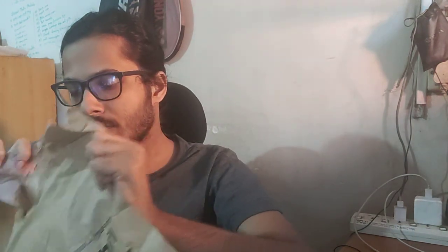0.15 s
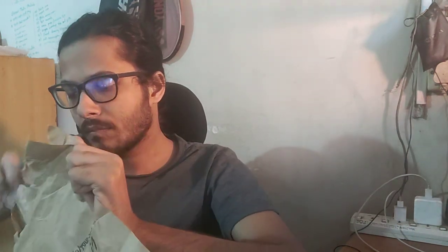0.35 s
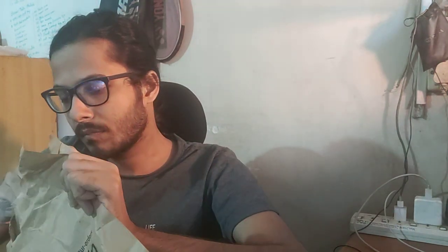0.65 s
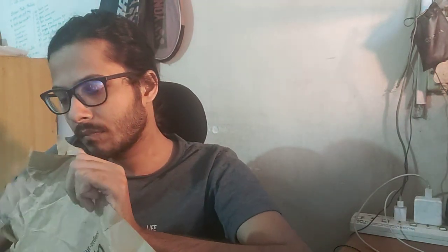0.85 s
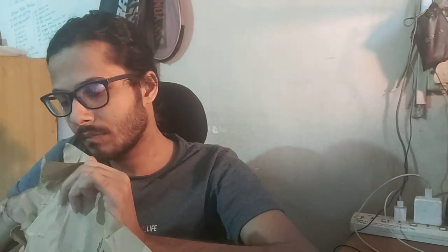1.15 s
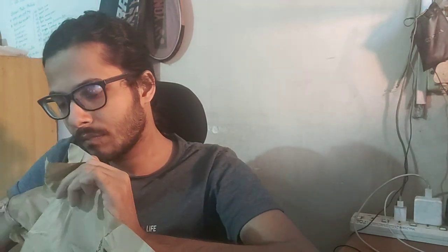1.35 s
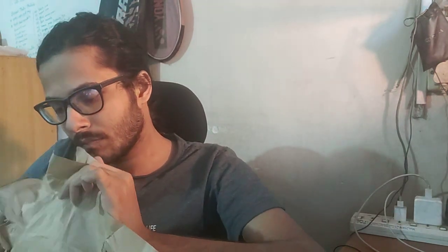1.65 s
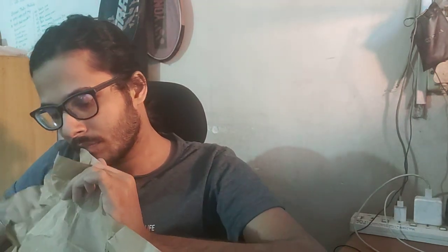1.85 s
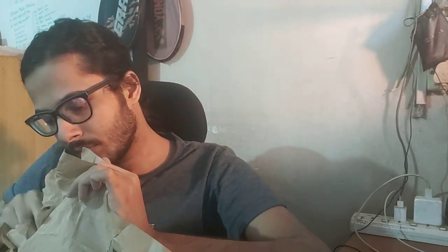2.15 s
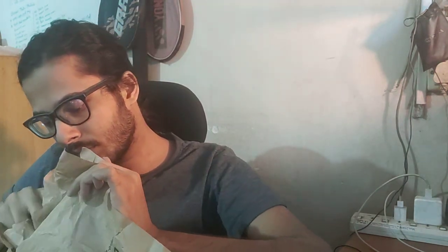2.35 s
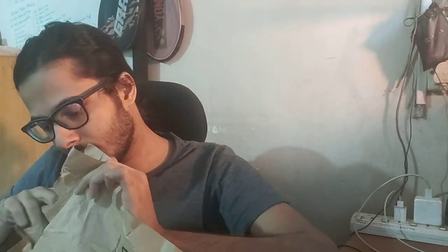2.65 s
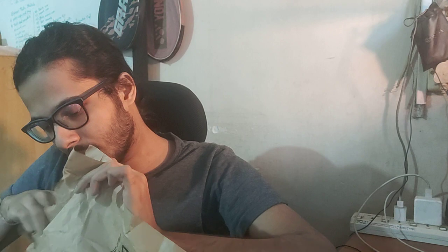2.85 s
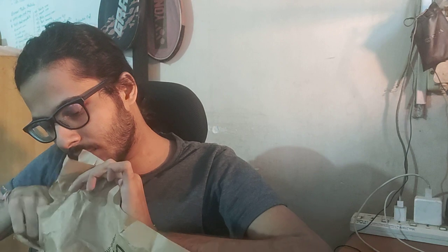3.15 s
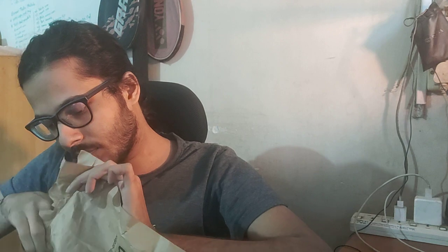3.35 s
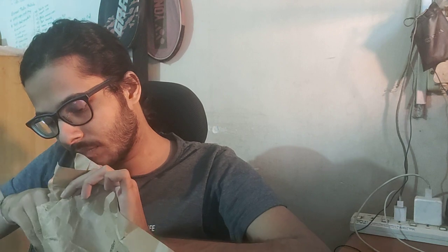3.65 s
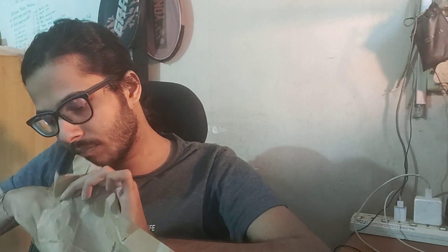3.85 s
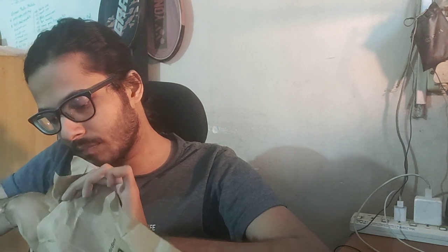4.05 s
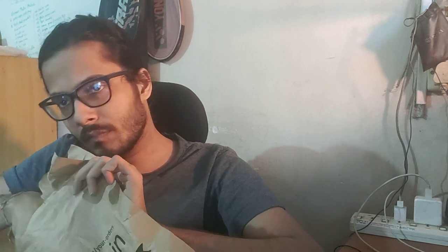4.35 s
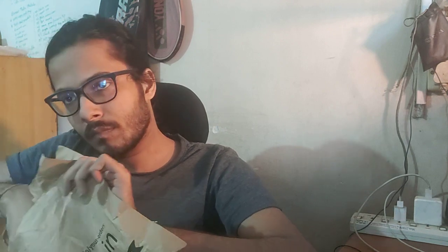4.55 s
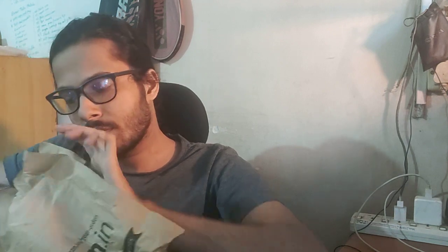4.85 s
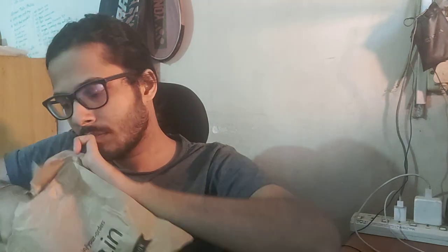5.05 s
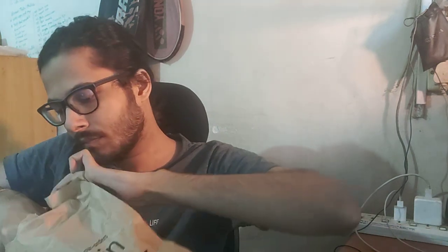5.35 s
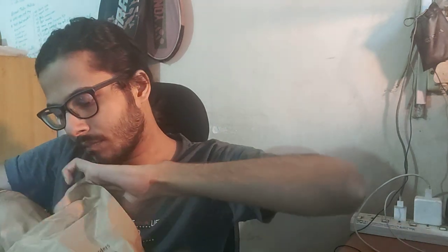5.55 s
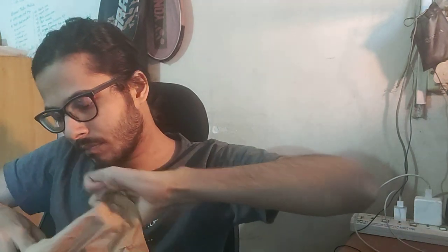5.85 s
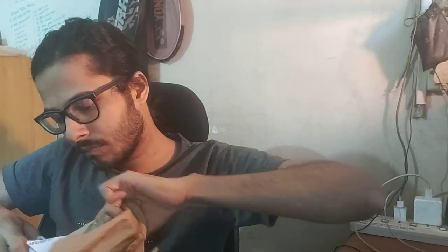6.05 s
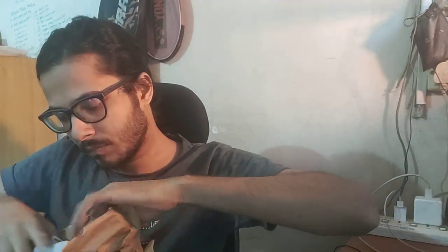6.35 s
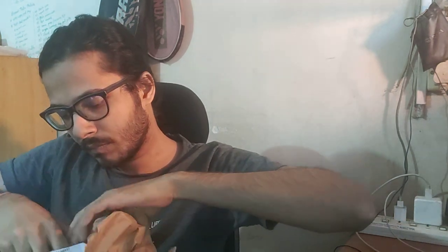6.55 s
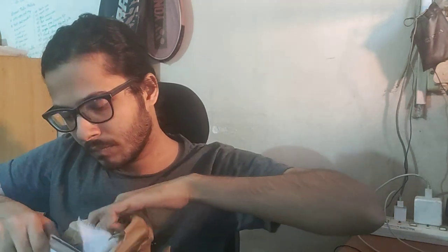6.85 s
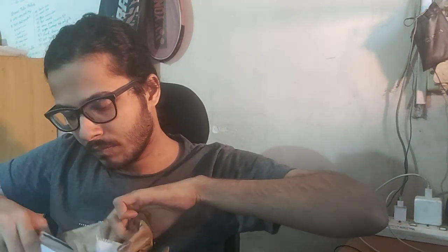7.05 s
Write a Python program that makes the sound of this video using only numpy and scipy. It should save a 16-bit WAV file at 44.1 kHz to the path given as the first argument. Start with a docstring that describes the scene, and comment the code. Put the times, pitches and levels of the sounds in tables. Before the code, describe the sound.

Brown paper bag crinkles and snaps in restless hands close to a microphone, builds to one hard ripping pull, then settles into small rustles.

```python
"""A desk in a small room: a brown paper bag is worked open by hand close to a bright little microphone.
Each flex of the fingers triggers a swarm of tiny crackle bursts over noise of sliding paper.
Big creases snap as a bright crack plus a duller knock of the sheet; one hard pull rips the bag.
Moving bag and arms add low noise rumble and one-cycle bumps; two dull taps ring damped modes.
The room answers the paper with a short tail; a steady hiss and two faint thin tones lie behind."""
import sys
import numpy as np
from scipy import signal
from scipy.fft import rfft, irfft
from scipy.io import wavfile
from scipy.ndimage import uniform_filter1d

SR = 44100
rng = np.random.default_rng(int(sys.argv[2]) if len(sys.argv) > 2 else 0)


def dump_mix(stems):
    """Bounce the given channels to the path in sys.argv[1] as a 16-bit WAV at rate SR."""
    frames = np.atleast_2d(stems).T  # one column per channel
    limited = np.clip(frames, -1, 1)  # hard clip at full scale
    pcm = np.round(limited * 32767).astype(np.int16)
    wavfile.write(sys.argv[1], SR, pcm)


N = 317961  # length in samples


def from_db(db):
    """Decibels to amplitude gain."""
    return 10 ** (np.asarray(db) / 20)


def rms_one(x):
    """Scale each row to rms 1."""
    return x / np.sqrt(np.mean(x ** 2, axis=-1, keepdims=True) + 1e-20)


def add(out, start_s, sound):
    """Mix a sound in at a time."""
    at = max(int(start_s * SR), 0)
    out[at:at + len(sound)] += sound[:max(N - at, 0)]


def drift(knots_per_s):
    """Slow random wander: straight lines between normal random knots of spread 1."""
    knots = rng.standard_normal(4000)
    return np.interp(np.arange(N) / SR * knots_per_s, np.arange(len(knots)), knots)


def colour(x, spectrum, size=512):
    """Filter each row to a spectrum with minimum phase, so nothing sounds ahead of its cause."""
    hz, db = np.transpose(spectrum)
    bin_hz = np.arange(size // 2 + 1) * SR / size
    log_gain = np.log(from_db(np.interp(np.log(bin_hz + 1), np.log(hz), db)))
    # doubling the later half-cepstrum folds it into a causal response
    cepstrum = irfft(log_gain)[:size // 2] * np.r_[1, np.full(size // 2 - 1, 2)]
    response = irfft(np.exp(rfft(cepstrum, size)))
    wet = signal.fftconvolve(np.atleast_2d(x), response[None], axes=1)
    return wet[:, :x.shape[-1]].reshape(x.shape)


def evened(x, span_s):
    """Hold the slow level near rms 1 and leave single clicks standing."""
    slow_power = np.maximum(uniform_filter1d(x ** 2, max(int(span_s * SR), 2)), 0)
    return x / np.sqrt(slow_power + 1e-3 * np.mean(x ** 2))


def gestures(rows, attack_s, release_s, held_db):
    """Level in dB of hand movements: each swells, holds and dies away over a resting level."""
    t, power = np.arange(N) / SR, np.full(N, from_db(held_db) ** 2)
    for start_s, length_s, db in rows:
        near = slice(max(int(start_s * SR), 0), int((start_s + length_s + 1) * SR))
        age = t[near] - start_s
        swell = np.clip(age / attack_s, 0, 1)
        decay = np.exp(-np.maximum(age - length_s, 0) / release_s)
        power[near] += (from_db(db) * swell * decay) ** 2
    return 10 * np.log10(power)


# Colour of the background hiss, relative: (f/Hz, level/dB per Hz)
HISS_SPECTRUM = [(30, 2.5), (90, -6.5), (220, -13.5), (390, -9.5), (520, -15), (780, -13), (2100, -22),
                 (4800, -21.5), (6500, -9.5), (7500, -19.5), (8500, -44.5)]
HISS_DB = -50.5  # rms


def steady_hiss():
    """Random noise of constant level and fixed colour."""
    return from_db(HISS_DB) * rms_one(colour(rng.standard_normal(N), HISS_SPECTRUM, size=4096))


# Fingers flexing the paper, before layer gains:
# (start t/s, length t/s, crackle level/dB, sheet level/dB)
FLEXES = [(0, 0.015, -35, -45), (0.186, .225, -44, -50.5), (0.233, 0.052, -34, -45),
          (0.544, 0.1, -48.5, -65), (0.674, .14, -41, -56.5), (0.928, .09, -42.5, -58),
          (1.081, .065, -39, -44.5), (1.161, 0.19, -50, -52.5), (1.417, .08, -38.5, -46),
          (1.531, .035, -41, -45.5), (1.597, 0.08, -45, -48), (1.687, .09, -40, -47.5),
          (1.838, 0.021, -41.5, -52), (1.915, 0.081, -39.5, -46.5), (2.034, 0.025, -45.5, -50.5),
          (2.144, 0.04, -46, -72), (2.328, 0.044, -47.5, -63), (2.469, 0.022, -49, -54),
          (2.576, 0.084, -44, -49.5), (2.665, .11, -44, -57), (2.813, 0.027, -49, -56),
          (3.001, 0.11, -41, -50), (3.093, 0.16, -38, -46), (3.28, .14, -47, -57), (3.49, 0.083, -43, -57),
          (3.597, 0.13, -43, -47.5), (3.701, .04, -37.5, -47.5), (3.799, .085, -46, -49),
          (3.946, 0.068, -39.5, -45), (4.042, .15, -35.5, -48.5), (4.204, .14, -42, -43),
          (4.348, 0.017, -44.5, -42), (4.719, 0.026, -54.5, -51), (4.784, 0.031, -43.5, -47.5),
          (4.882, 0.035, -44.5, -65), (5.055, .19, -39.5, -48.5), (5.249, .18, -39.5, -43.5),
          (6.305, 0.03, -34.5, -51), (6.368, .21, -41, -48), (6.681, 0.036, -48, -48.5),
          (6.751, .08, -42, -53.5), (6.906, .07, -44.5, -57), (6.969, .24, -38.5, -48.5)]
FLEX_ATTACK_S, FLEX_RELEASE_S = 0.022, 0.031  # the grip tightens, then the paper settles
HELD_CRACK_DB, HELD_SHEET_DB = -57.5, -59.5  # the bag creaks faintly even when just held
# Effort of the hard pull that rips the bag: (t/s, crackle level/dB before layer gains)
PULL = [(5.575, -63), (5.597, -36), (5.811, -33), (5.835, -22.5), (5.955, -28.5), (6.035, -39),
        (6.123, -31), (6.19, -43), (6.225, -65)]
PULL_SHEET_DB = -8.5  # sheet relative to crackle


def paper_effort():
    """Hand force as crackle and sheet levels in dB: the louder of small flexes and the hard pull."""
    starts, lengths, cracks_db, sheets_db = np.transpose(FLEXES)
    pull_s, pull_levels = np.transpose(PULL)
    pull_db = np.interp(np.arange(N) / SR, pull_s, pull_levels)
    crack_db = gestures(zip(starts, lengths, cracks_db), FLEX_ATTACK_S, FLEX_RELEASE_S, HELD_CRACK_DB)
    sheet_db = gestures(zip(starts, lengths, sheets_db), FLEX_ATTACK_S, FLEX_RELEASE_S, HELD_SHEET_DB)
    return np.maximum(crack_db, pull_db), np.maximum(sheet_db, pull_db + PULL_SHEET_DB)


def small_folds(effort_db, per_s, growth, spread_db, clump_db):
    """Little creases give way in clumps, faster under more effort; most are tiny, a few are large."""
    effort_above = effort_db - np.median(effort_db)
    rate = per_s * from_db(growth * effort_above + clump_db * drift(45))
    sizes = from_db(spread_db * np.minimum(rng.exponential(1, N), 3.6)) * rng.choice([-1, 1], N)
    return sizes * (rng.random(N) < rate / SR)


def buckles(spectrum, rises, vary_db, facet_hz, octaves, ring_db, ring_cycles, size=1100):
    """One unit-energy burst per rise time: a fold's noise flurry sets a facet of paper ringing."""
    t, bursts = np.arange(size) / SR, []
    for rise_s in rises:
        age = t / rise_s
        own_spectrum = [(hz, db + rng.normal(0, vary_db)) for hz, db in spectrum]
        noise = rng.standard_normal(size) * age * np.exp(-age)
        flurry = rms_one(colour(noise, own_spectrum))
        pitch = facet_hz * 2 ** (octaves * rng.uniform(-0.498, 0.486))
        decay = from_db(-60 * pitch * t / ring_cycles)  # 60 dB down after ring_cycles
        ring = rms_one(np.sin(2 * np.pi * pitch * t) * (1 - np.exp(-age)) * decay)
        bursts.append(flurry + from_db(ring_db + rng.normal(0, 3.3)) * ring)
    return rms_one(np.array(bursts)) / np.sqrt(size)


# Colour of a fold cracking, relative: (f/Hz, level/dB per Hz)
CRACK_SPECTRUM = [(400, -47.5), (1500, -25.5), (3000, -18.5), (4200, -13.5), (5200, -9.5), (6000, -1),
                  (6600, 1.5), (7300, -4.5), (7900, -18.5), (8600, -22.5)]
# Colour of the paper sheet around it, relative: (f/Hz, level/dB per Hz)
SHEET_SPECTRUM = [(120, -14.5), (250, -8.5), (390, -2), (540, -6), (780, -5.5), (1100, -1.5), (1350, -1.5),
                  (1600, 1), (2200, -2), (3200, -1), (4500, -1), (7000, -16)]


def small_creases():
    """A stock of 200 small creases: the bright crack of each and the slower, duller sheet."""
    rises = 0.00035 * from_db(rng.normal(0, 5.4, size=200))  # s
    bright = buckles(CRACK_SPECTRUM, rises, vary_db=3.5, facet_hz=5900, octaves=0.6,
                     ring_db=-11, ring_cycles=95)
    dull = buckles(SHEET_SPECTRUM, 1.74 * rises, vary_db=4.5, facet_hz=2088, octaves=1.8,
                   ring_db=-11, ring_cycles=55)
    return bright, dull


def crinkle(folds, creases, spectrum, grain_db, slide_db, slide_rough_db):
    """Little folds dealt to many creases, over the uneven hiss of paper sliding on paper."""
    dealt = rng.integers(0, len(creases), N)
    sizes = folds * from_db(rng.normal(0, 2.35, N))
    grains = np.zeros(N)
    for at in np.flatnonzero(folds):
        add(grains, at / SR, sizes[at] * creases[dealt[at]])
    rough_noise = rng.standard_normal(N) * from_db(slide_rough_db * drift(220))
    slide = rms_one(colour(rough_noise, spectrum))
    return from_db(grain_db) * evened(grains, 0.054) + from_db(slide_db) * slide


def stray_ticks(effort_db, bright, dull, per_s, crack_db, sheet_db, follows, spread_db):
    """Now and then a lone crease ticks, even in the lulls; it is louder under more effort."""
    out, draws = np.zeros(N), rng.random((len(bright), 3))
    middle_db = np.median(effort_db)
    for k, (when, crack_size, sheet_size) in enumerate(draws):
        start_s = (k + when) / per_s  # one at random in each equal slot
        if start_s < N / SR:
            crack = from_db(crack_db + spread_db * crack_size) * bright[k]
            sheet = from_db(sheet_db + spread_db * (sheet_size - 1)) * dull[k]
            effort_gain = from_db(follows * (effort_db[int(start_s * SR)] - middle_db))
            add(out, start_s, effort_gain * (crack + sheet))
    return out


def room(x, t60, tail_db, near_db, near_s, near_t60):
    """Desk and near wall scatter the sound back within milliseconds; a short tail follows."""
    t = np.arange(SR // 2) / SR
    tail = rng.standard_normal(len(t)) * from_db(-60 * t / t60) * (t > 0.003)
    near = rng.standard_normal(len(t)) * from_db(-60 * t / near_t60) * (t > near_s)
    response = from_db(tail_db) * rms_one(tail) + from_db(near_db) * rms_one(near)
    return x + signal.fftconvolve(x, response / np.sqrt(len(t)))[:N]


# Arms shifting the bag: (start t/s, length t/s, level/dB before the rumble gain)
SHIFTS = [(.04, 0.065, -38), (.2, 0.15, -38.5), (.47, 0.42, -39), (.92, 0.51, -47.5), (1.54, 0.31, -49),
          (2.04, .15, -44.5), (2.36, 0.18, -47), (2.73, 0.13, -40), (2.95, 0.16, -39), (3.1, 0.12, -45),
          (3.3, .5, -45.5), (3.88, 0.27, -47), (4.53, 0.21, -42), (4.92, 0.66, -44), (5.59, 0.35, -42),
          (6.05, 0.047, -38), (6.22, 0.051, -39), (6.4, 0.32, -40.5), (6.79, 0.36, -43),
          (7.02, 0.18, -42.5)]
SHIFT_ATTACK_S, SHIFT_RELEASE_S, HELD_RUMBLE_DB = 0.012, 0.03, -54
# Colour of the low rumble, relative: (f/Hz, level/dB per Hz)
RUMBLE_SPECTRUM = [(12, -7.5), (26, 4), (90, 0), (170, -8.5), (260, -18.5), (400, -29.5), (900, -62.5)]


def handling_rumble(rumble_db, lumpy_db):
    """The arms shift the bag: lumpy low noise swells with each movement."""
    lumps = rng.standard_normal(N) * from_db(lumpy_db * drift(50))
    moving_db = gestures(SHIFTS, SHIFT_ATTACK_S, SHIFT_RELEASE_S, HELD_RUMBLE_DB)
    return from_db(moving_db + rumble_db) * evened(colour(lumps, RUMBLE_SPECTRUM, size=8192), 0.12)


# Creases that buckle loudly, before layer gains:
# (t/s, level/dB of the fold's crack, level/dB of the sheet round it)
SNAPS = [(0.0606, -34, -40), (0.139, -40, -45), (0.2087, -33.5, -35), (0.2444, -35, -43), (0.269, -40, -42),
         (0.2828, -28, -33.5), (0.359, -35, -42), (0.411, -34.5, -39), (0.7118, -35, -52),
         (0.811, -32.5, -47), (1.0134, -39, -39), (1.0926, -34.5, -40), (1.294, -39, -36),
         (1.3621, -33.5, -49), (1.453, -19.5, -28.5), (1.65, -45, -50), (1.7655, -40, -40.5),
         (1.9233, -41, -45), (1.9442, -39, -37), (1.9681, -31, -36), (2.0534, -33.5, -39),
         (2.4178, -38, -57), (2.6037, -31.5, -46), (2.7096, -38, -37), (2.7515, -29.5, -47),
         (3.1467, -36, -53), (3.2561, -28.5, -32), (3.4537, -25.5, -38.5), (3.5604, -34, -43),
         (3.598, -26.5, -57), (3.707, -21, -33), (3.7284, -25, -47.5), (3.7919, -19.5, -38.5),
         (3.877, -40, -45), (3.9671, -34.5, -47), (3.9846, -36, -51), (4.0773, -31, -38),
         (4.0955, -29.5, -38.5), (4.1683, -40.5, -55), (4.1963, -29, -50), (4.262, -33.5, -36),
         (4.2905, -21.5, -35.5), (4.3316, -25.5, -53), (4.5039, -28, -37.5), (4.582, -41, -41.5),
         (4.647, -39, -41), (4.8085, -30, -54), (4.8956, -36, -40.5), (5.0146, -39, -53), (5.06, -40, -44),
         (5.1283, -34, -55), (5.1446, -31, -39.5), (5.1764, -35, -40.5), (5.2861, -31, -31.5),
         (5.3515, -28, -41), (5.3704, -27, -40), (5.4926, -25.5, -40.5), (5.594, -31, -48),
         (5.6963, -28.5, -26.5), (5.8125, -22.5, -52), (5.8345, -19, -30), (5.8381, -14.5, -36.5),
         (5.8466, -18, -39), (5.8826, -18, -29), (5.8906, -28, -40), (5.9321, -24, -31),
         (5.9407, -22.5, -31.5), (5.9471, -20.5, -28), (5.9688, -24, -43.5), (5.9951, -26, -32),
         (6.0532, -22, -42), (6.0761, -27, -42), (6.0798, -21, -36), (6.126, -27, -27), (6.1315, -17, -38),
         (6.1432, -23, -50), (6.2968, -36, -40), (6.3831, -31.5, -39.5), (6.4495, -34, -52),
         (6.6983, -37, -44.5), (6.767, -33.5, -45), (7.0047, -26, -60), (7.0678, -33, -39),
         (7.1017, -26, -38.5)]


def snaps(effort_db, crack_db, sheet_db, rise_s, growth):
    """A big crease snaps: bright crack and longer sheet knock, both drawn out under a hard pull."""
    times = [s for s, *_ in SNAPS]
    effort = np.interp(times, np.arange(N) / SR, effort_db - np.median(effort_db))
    rises = rise_s * from_db(growth * np.maximum(effort, 0) + rng.normal(0, 1.8, len(SNAPS)))
    cracks = buckles(CRACK_SPECTRUM, rises, vary_db=1.6, facet_hz=6000, octaves=0.5,
                     ring_db=-15, ring_cycles=70)
    sheets = buckles(SHEET_SPECTRUM, 2.55 * rises, vary_db=1.0, facet_hz=1860, octaves=1.6,
                     ring_db=-9.5, ring_cycles=86)
    out = np.zeros(N)
    for (start_s, bright, dull), crack, sheet in zip(SNAPS, cracks, sheets):
        add(out, start_s, from_db(bright + crack_db) * crack + from_db(dull + sheet_db) * sheet)
    return out


SETTLE_DB, SETTLE_ATTACK_S, SETTLE_S = -13, 0.0026, 0.019  # relative to the snap, rise, decay


def settling(effort_db, snap_rows):
    """After a snap the paper round it settles in a brief crinkle, added to the effort as power."""
    rows = [(s, SETTLE_ATTACK_S, db + SETTLE_DB) for s, db in snap_rows]
    after_db = gestures(rows, SETTLE_ATTACK_S, SETTLE_S, held_db=-90.5)
    return 10 * np.log10(from_db(effort_db) ** 2 + from_db(after_db) ** 2)


# Soft bumps of the handling: (centre t/s, peak level/dB before the bump gain, f/Hz)
BUMPS = [(0.098, -33.5, 108), (0.507, -36, 62.5), (0.685, -31.5, 92), (0.777, -32, 125), (0.808, -34, 162),
         (0.844, -31, 108), (0.895, -31.5, 110), (1.45, -34, 105), (2.151, -36.5, 113), (3.004, -31, 123),
         (3.057, -36.5, 144), (4.592, -33.5, 89), (5.639, -28.5, 145), (5.78, -31.5, 97),
         (6.083, -33.5, 125), (6.535, -32, 166), (6.873, -27, 132), (7.072, -30, 111)]


def handling_bumps(bump_db):
    """Each bump pushes the air once and lets it back: one smooth swing either way."""
    out, t = np.zeros(N), np.arange(-SR // 40, SR // 40) / SR
    for centre_s, db, hz in BUMPS:
        phase = 2 * np.pi * hz * t
        swing = -phase * np.exp((1 - phase ** 2) / 2)  # peaks at 1
        add(out, centre_s + t[0], from_db(db + bump_db) * swing)
    return out


# Faint background tones: (start t/s, length t/s, f/Hz, peak level/dB)
TONES = [(2.438, 0.22, 758, -63), (3.56, 0.24, 764, -54.5)]


def thin_tones():
    """Pure sines with soft ends."""
    out = np.zeros(N)
    for start_s, length_s, hz, db in TONES:
        t = np.arange(int(length_s * SR)) / SR
        add(out, start_s, from_db(db) * signal.windows.tukey(len(t)) * np.sin(2 * np.pi * hz * t))
    return out


# Light dull taps: (t/s, level/dB)
TAPS = [(6.222, -44.5), (6.283, -35.5)]
# What each tap rings with: (f/Hz, level/dB relative to the tap, 60 dB decay t/s)
TAP_MODES = [(693, -5.5, 0.033), (776, 0.5, 0.025), (870, -14.5, 0.026), (1250, -18, .02)]


def taps():
    """A light touch rings a few damped modes."""
    out, t = np.zeros(N), np.arange(SR // 10) / SR
    ring = sum(from_db(db - 60 * t / t60) * np.sin(2 * np.pi * hz * t) for hz, db, t60 in TAP_MODES)
    for start_s, db in TAPS:
        add(out, start_s, from_db(db) * ring)
    return out


def scene():
    """Paper in the room, with handling, steady hiss and thin tones mixed in dry."""
    crack_db, sheet_db = paper_effort()
    folds = small_folds(crack_db, per_s=340, growth=0.6, spread_db=1.5, clump_db=4.5)
    bright, dull = small_creases()
    crackle_db = settling(crack_db, [(s, db) for s, db, _ in SNAPS])
    rustle_db = settling(sheet_db, [(s, db) for s, _, db in SNAPS])
    crackle = from_db(crackle_db) * crinkle(folds, bright, CRACK_SPECTRUM, grain_db=-6.5,
                                            slide_db=-1.5, slide_rough_db=4.0)
    rustle = from_db(rustle_db) * crinkle(folds, dull, SHEET_SPECTRUM, grain_db=0.2,
                                          slide_db=-6.5, slide_rough_db=3.0)
    ticks = stray_ticks(crack_db, bright, dull, per_s=15, crack_db=-18.5, sheet_db=-23.5,
                        follows=0.78, spread_db=8.5)
    big_snaps = snaps(crack_db, crack_db=24.0, sheet_db=22.5, rise_s=0.00061, growth=0.31)
    close = crackle + rustle + ticks + big_snaps + taps()
    heard = room(close, t60=0.27, tail_db=-10.5, near_db=-28.0, near_s=0.006, near_t60=0.019)
    handling = handling_rumble(rumble_db=-0.5, lumpy_db=2.5) + handling_bumps(bump_db=2.5)
    return (heard + steady_hiss() + thin_tones() + handling)[None]


CUTOFF_HZ = 8900  # from here up, at least 60 dB down


def record(dry):
    """A steep low-pass cuts off the top."""
    return signal.sosfilt(signal.cheby2(14, 60, CUTOFF_HZ, fs=SR, output="sos"), dry)


dry = scene()
out = record(dry)
dump_mix(out)
```